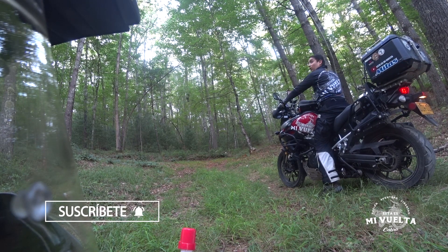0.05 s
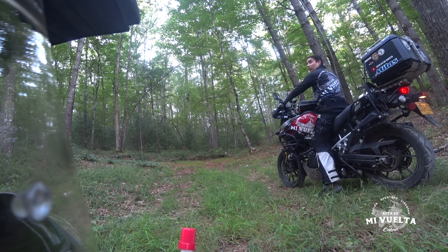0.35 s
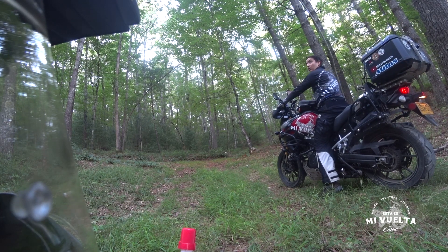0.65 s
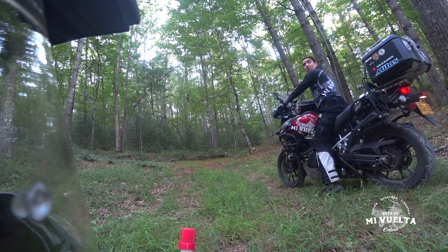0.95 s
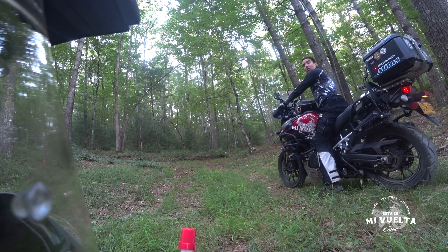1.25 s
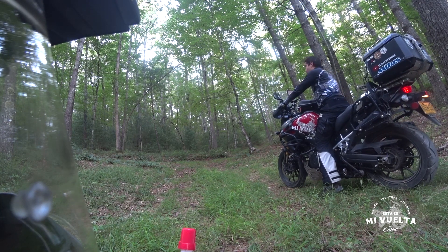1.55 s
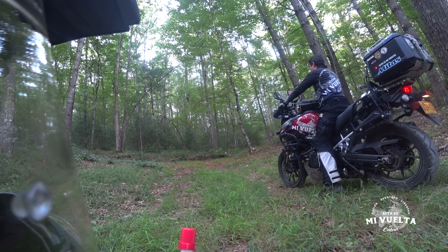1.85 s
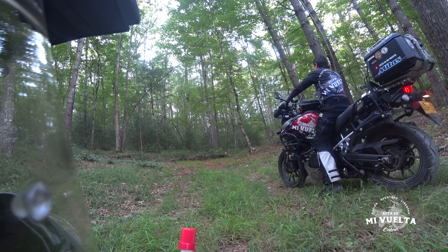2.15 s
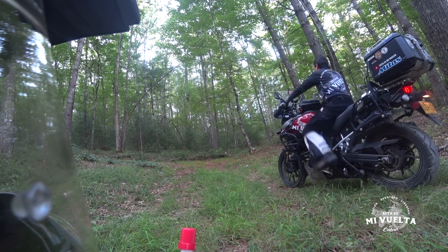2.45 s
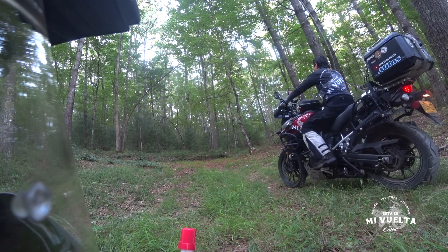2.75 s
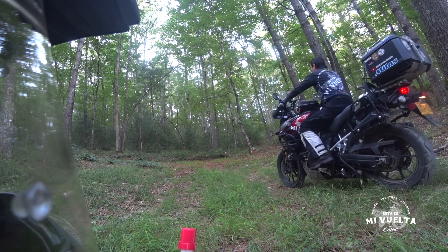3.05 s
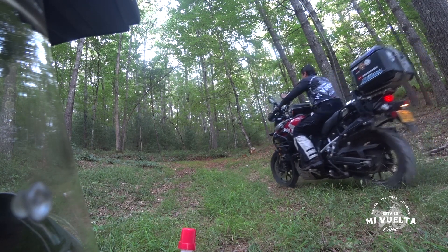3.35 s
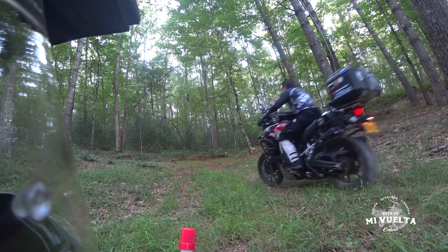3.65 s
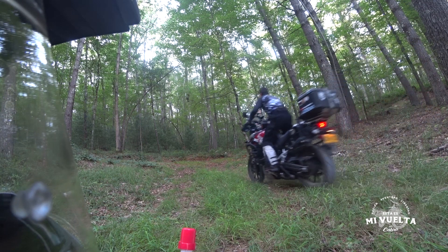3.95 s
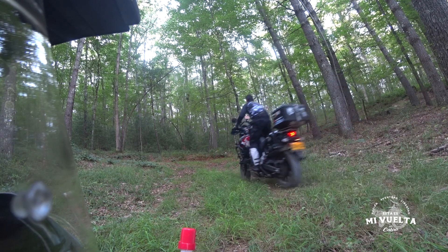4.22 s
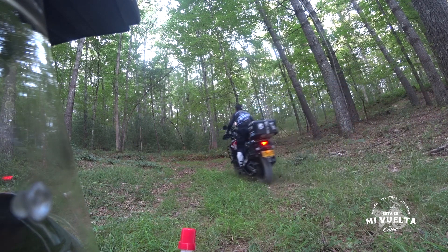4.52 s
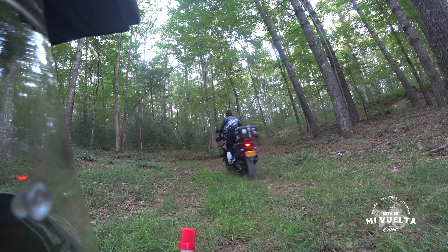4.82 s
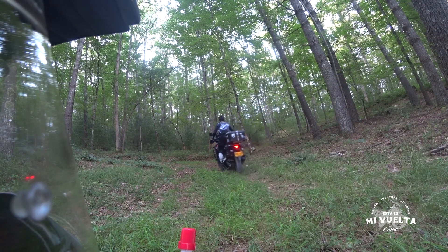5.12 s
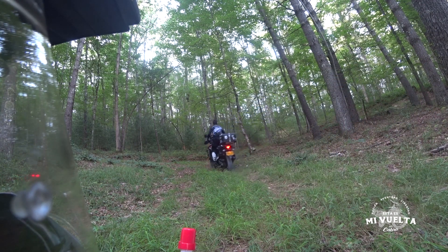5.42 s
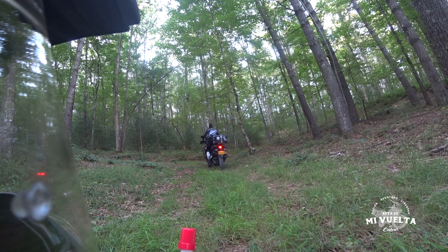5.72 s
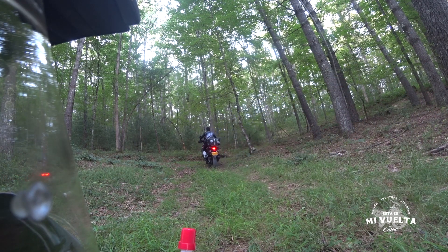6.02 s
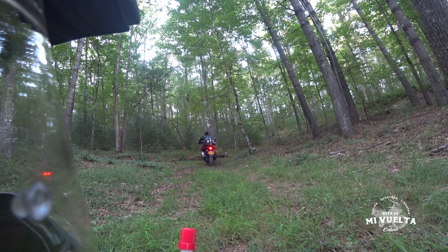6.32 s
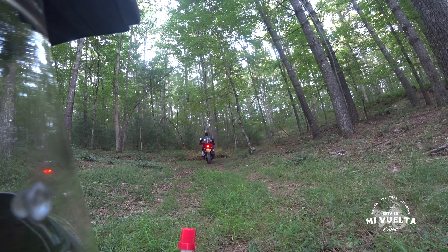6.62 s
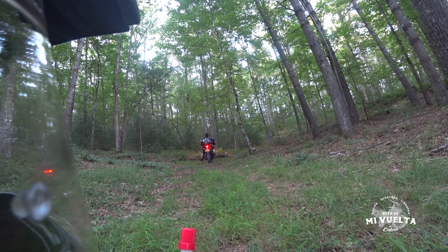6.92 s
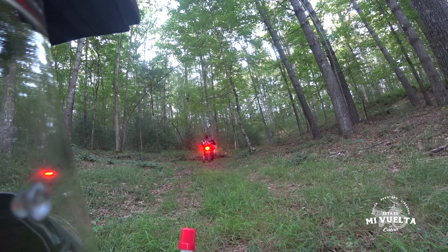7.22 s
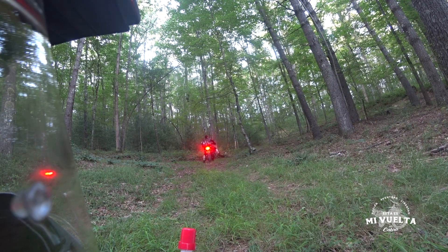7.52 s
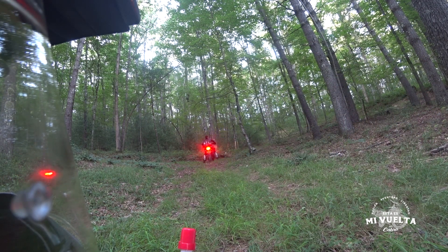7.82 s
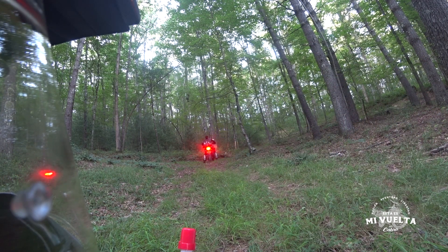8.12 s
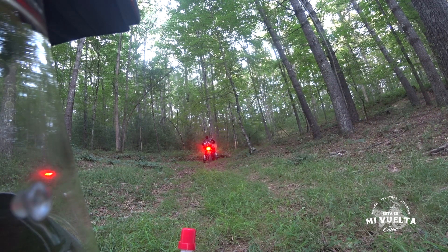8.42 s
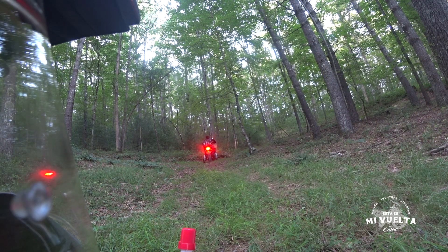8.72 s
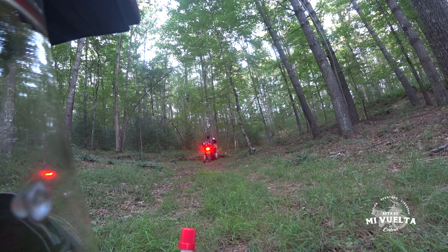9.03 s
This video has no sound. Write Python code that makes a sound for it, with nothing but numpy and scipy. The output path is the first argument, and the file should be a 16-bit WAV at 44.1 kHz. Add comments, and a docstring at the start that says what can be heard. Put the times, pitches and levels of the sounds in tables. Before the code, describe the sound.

A motorcycle about two metres from a fixed microphone primes with a thin whine, then starts with a short metallic grind. After a brief idle of uneven exhaust beats and valve clatter, the engine grows louder and rides off, revs rising and dipping, gears whining and twigs cracking. The sound recedes into still woods with a light echo and ends as a slow, distant idle.

```python
"""Motorcycle in a forest clearing

A V-twin stands about two metres from a camera with two close microphone ports. The fuel pump whines,
the starter grinds, the engine catches and idles. The bike pulls away over grass and twigs, then slows
to an idle far off among the trees. Exhaust beats, valve clatter and gear whine all follow the crank."""
import sys
import numpy as np
from scipy import signal
from scipy.fft import rfft, irfft
from scipy.io import wavfile
from scipy.ndimage import uniform_filter1d, map_coordinates

SR = 44100
rng = np.random.default_rng(int(sys.argv[2]) if len(sys.argv) > 2 else 0)


def master(y):
    """Save y as 16-bit WAV."""
    cut = np.clip(np.atleast_2d(y).T, -1, 1)
    pcm = np.round(cut * 32767)  # scale
    wavfile.write(sys.argv[1], SR, pcm.astype(np.int16))


N = 399987
T = np.arange(N) / SR

# still air in the clearing: (frequency [Hz], level [dB])
FOREST_SPECTRUM = [(50, -39), (120, -12), (200, -7.5), (1000, 5.5), (2500, -2), (8000, -11), (11000, -9)]
# background hiss before the level steps down: (frequency [Hz], level [dB])
HISS_SPECTRUM = [(50, -34), (120, -18), (250, -6.5), (1000, 2.5), (2500, -3.5), (6000, -11.5), (11000, -8)]
# between the microphone ports: (frequency [Hz], left phase lead [rad])
PORT_LEAD = [(60, 1), (150, -0.063), (340, -0.74), (1000, -1.13), (2700, -1), (3600, -0.84), (6000, -0.77),
             (11000, -0.067)]
# (frequency [Hz], likeness of the ports [0-1])
PORT_LIKENESS = [(60, 1), (2500, 0.4), (5000, 0.48), (11000, 0.34)]
# bike close by, and once it has left: (frequency [Hz], left minus right [dB])
BALANCE_NEAR = [(100, 2), (1000, 1), (2000, 1), (4000, -3), (10000, -3.5)]
BALANCE_FAR = [(100, 2.1), (2000, 1.8), (6000, 1.9)]
# twigs and stones under the tyres: (time [s], level [dB], ring [Hz])
TWIG_SNAPS = [(4.672, -38, 3760), (4.818, -31, 4020), (5.024, -35, 7500), (5.127, -32.5, 3660),
              (5.4, -29, 5060), (5.414, -28, 3460), (5.761, -36, 8000), (6.179, -38, 3460),
              (6.299, -35.5, 4320)]
# switch, lever and solenoid: (time [s], level [dB], centre [Hz], spread [octaves], t60 [s])
SWITCH_CLICKS = [(.911, -50.5, 2380, 1.66, 0.1), (.942, -49.5, 477, 0.73, 0.1),
                 (.986, -54.5, 8700, 0.49, .03), (1.172, -30.5, 4330, 1.9, 0.039)]
# grinding metal: (frequency [Hz], level [dB])
GRIND_SPECTRUM = [(100, -42), (400, -19.5), (800, -19), (1000, -7.5), (1500, 2.5), (2400, -3.5),
                  (3300, -11.5), (4300, -7), (5200, -20.5), (7500, -15), (11000, -24)]
# starter drive slipping: (time [s], level [dB], pitch [Hz], half length [s], roughness [0-1])
STARTER_SQUAWKS = [(1.215, -24, 1640, .003, 0.1), (1.235, -25, 1500, 0.0054, 0.24),
                   (1.256, -19.5, 1630, 0.0062, 0.27), (1.273, -20.5, 1650, 0.0046, 0.13),
                   (1.356, -13, 1420, 0.0041, 0.29), (1.380, -15.5, 1430, 0.0051, 0.5),
                   (1.405, -22, 1500, 0.0077, 0.67), (1.476, -14, 1690, 0.006, 0.52),
                   (1.49, -12.5, 1600, 0.0041, 0.3), (1.502, -12.5, 1390, 0.0044, 0.18)]
# crank: (time [s], four-stroke cycle rate [Hz])
CRANK_SPEED = [(1.412, 3.44), (1.55, 13.2), (1.64, 14.5), (1.72, 13.8), (1.85, 11.4), (2.03, 11.5),
               (2.218, 10.66), (2.432, 11.69), (2.803, 11.4), (2.945, 10.79), (3.131, 15.01), (3.616, 15.3),
               (3.937, 17.51), (4.021, 12.45), (4.173, 12.24), (4.448, 17.84), (4.838, 12.4),
               (5.132, 14.95), (5.369, 15.1), (5.581, 14.44), (5.702, 15.54), (5.87, 13.74), (6.019, 13.2),
               (6.274, 17.16), (6.65, 16.05), (6.78, 19.2), (6.82, 18.6), (6.91, 15.4), (7.04, 11.75),
               (7.13, 9), (7.49, 9), (7.566, 9.6), (7.86, 9.36), (8.09, 9.75), (8.18, 9.4), (8.6, 9.25),
               (8.77, 9.7), (8.9, 9.4)]
# the rider's hand: (time [s], throttle opening [0-1])
HAND_THROTTLE = [(2.96, 0), (3.04, 0.56), (3.6, 0.81), (4.0, 0.92), (4.1, 0.61), (4.35, 1), (4.58, 0.75),
                 (5.75, 0.9), (6.05, 0.66), (6.86, 0.73), (7.06, 0.53)]
# rolling off and braking: (time [s], speed [m/s])
ROAD_SPEED = [(3.35, 0), (4.05, 3), (6.7, 7), (7.35, 0.5)]
# whines as the engine eases off: (time [s], length [s], level [dB], pitch [Hz], fall [Hz/s])
FALLING_WHINES = [(1.631, .17, -36.5, 3290, 2870), (2.222, .13, -40, 3340, 4900),
                  (6.5, 0.31, -54, 4110, 2610)]
# chain and tyres: (frequency [Hz], level [dB])
CHAIN_SPECTRUM = [(2500, -14.5), (4000, 1), (5000, -1), (7500, 1), (9000, -7), (10200, -3.5), (11200, -14)]
# valve and piston knocks: (place in cycle [0-1], level [dB])
VALVE_KNOCKS = [(.01, -1.5), (.12, 2.5), (.29, -0.5), (.35, 1.5), (.47, -1.5), (.6, -1.5), (.69, -1.5),
                (.95, -0.5)]
# gear tones: (multiple of cycle rate, level free [dB], level loaded [dB], lift when smooth [dB])
GEAR_TONES = [(62, -9, -9, 0), (66, -16, -4, 0), (86, -20, -1, 0), (124, -6, -3, -5), (166, 0, -4, 8),
              (226, -3, -14, -4)]
# slack in the clutch: (place in cycle [0-1], level [dB])
CLUTCH_LASH = [(.78, -3), (.87, -1.5), (.97, -5), (.18, -4)]
# the clutch bites, the engine lugs or stumbles: (time [s], level [dB], ring [Hz])
CLUTCH_CLACKS = [(3.531, -18, 1929), (3.8, -17, 2000), (3.862, -22, 2078), (4.059, -19, 1947),
                 (4.141, -21, 1950), (4.220, -23, 1946), (4.291, -20, 1896), (4.343, -20, 1920),
                 (7.149, -39, 1870), (7.402, -42, 2050), (7.441, -40, 2070), (7.719, -41, 2110)]
# the cases under load: (place in cycle [0-1], ring [Hz], level [dB])
CASE_PINGS = [(.96, 1300, -2.5), (.34, 1310, -1.5), (.43, 1040, -4), (0.92, 1920, -4)]
# crankcase resonances: (frequency [Hz], width [Hz], lift [dB])
CASE_MODES = [(1680, 59, 3.5), (1864, 52, 2.5), (2272, 10.3, 7)]
# engine beside the microphone, pulling off, riding away, far off: (frequency [Hz], level [dB])
ENGINE_BESIDE = [(150, -55), (300, -11.5), (520, -5.5), (650, -3.5), (725, 3.5), (830, 0.5), (1100, 0),
                 (1300, 4), (1440, 6), (1580, 1), (1900, 2), (2120, 3.5), (2300, 5), (2550, -1.5),
                 (4200, -7.5), (5500, -36)]
ENGINE_PULLING = [(150, -19), (280, 8.5), (560, 8.5), (700, 8.5), (850, 13), (1010, 11.5), (1120, 11.5),
                  (1310, 15), (1500, 7), (1650, 12.5), (1900, 14), (2060, 15.5), (2350, 16.5), (2620, 11.5),
                  (2900, 9.5), (4200, 5.5), (5500, -26), (8000, -38)]
ENGINE_AWAY = [(150, -34), (250, -5.5), (378, -4.5), (523, 4.5), (587, 2), (801, 2), (900, -4.5), (1070, 7),
               (1280, 5), (1490, 1), (1830, 4.5), (2060, 8.5), (2300, 3.5), (2920, 2), (3680, 2),
               (5500, -18), (7150, -35), (12100, -120)]
ENGINE_FAR = [(150, -55), (250, -5.5), (447, -3), (543, 6), (865, -8), (1140, 5), (1430, -1.5), (1650, 1.5),
              (1810, 3.5), (2080, 6.5), (2700, 1.5), (3640, -0.5), (4650, -10.5), (5500, -28), (7150, -91),
              (12100, -120)]
# fades from each of those colours to the next: (time [s], length [s])
COLOUR_FADES = [(2.898, 0.37), (3.94, 0.63), (6.9, 0.4)]
# single hard firings: (time [s], level [dB])
HARD_FIRINGS = [(1.534, -33.5), (1.566, -33), (7.14, -46)]
# one exhaust puff: (frequency [Hz], level [dB])
PUFF_SPECTRUM = [(25, -40), (45, -38), (60, -2), (76, 2.5), (100, -4), (130, -3.5), (200, -10), (270, -23),
                 (400, -22), (700, -26), (1500, -39.5)]

FIRINGS = [0, .375]  # the two cylinders' places in the cycle
# (level parked [dB], lift at full throttle [dB], loss per doubling of distance [dB])
THUMP_LAW, RING_LAW = (-56, 16.1, 4), (-52.5, 13.4, 3.46)  # the pipe points back, so it fades least
CLATTER_LAW, CHAIN_LAW = (-29.5, 4.43, 5.95), (-45, 7.43, 5.01)
LEVEL_STEP_S = 0.582  # pump whine and background hiss both drop abruptly as the level steps down
STARTER_ON_S, STARTER_OFF_S = 1.17, 1.56
PARKED_M, BAND_LIMIT_HZ = 2.13, 11150


def gain_of(db):
    """Decibels to gain."""
    return 10 ** (np.asarray(db) / 20)


def unit_rms(x):
    """Scales to rms 1."""
    return x / np.sqrt(np.mean(x ** 2) + 1e-20)


def steadied(x, size=9000):
    """Scales to a running rms of 1."""
    power = abs(uniform_filter1d(uniform_filter1d(x ** 2, size), size))
    return x / np.sqrt(power + 1e-4 * np.mean(x ** 2))


def at_hz(points, hz):
    """Interpolates a table on a log-frequency axis."""
    f, value = np.transpose(points)
    return np.interp(np.log(hz + 1), np.log(f + 1), value)


def curves(rows):
    """Each column of a timed table at every sample."""
    s, *columns = np.transpose(rows)
    return [np.interp(T, s, c) for c in columns]


def after(s, rise):
    """Ramps from 0 to 1, starting at time s."""
    return np.clip((T - s) / rise, 0, 1)


def noise():
    """White noise."""
    return rng.standard_normal(N)


def wander(hz):
    """Random drift of rms 1, up to about this rate."""
    lowpass = np.exp(-(np.fft.rfftfreq(N, 1 / SR) / hz) ** 2)
    return unit_rms(irfft(rfft(noise()) * lowpass, N))


def sine(hz):
    """A tone that follows a pitch curve."""
    return np.sin(2 * np.pi * np.cumsum(hz) / SR)


def coloured(x, points, modes=(), size=8192):
    """Causal filter from a spectrum and resonant lifts."""
    hz = abs(np.fft.fftfreq(size, 1 / SR))
    db = at_hz(points, hz) + sum(lift / (1 + ((hz - f) / width) ** 2) for f, width, lift in modes)
    log_gain = np.log(gain_of(np.maximum(db, -100)))
    response = np.fft.ifft(np.exp(signal.hilbert(log_gain).conj())).real
    return signal.oaconvolve(x, response[:size // 2])[:len(x)]


def resonate(x, hz, width):
    """A resonance of gain 1 that can follow a pitch curve."""
    carrier = np.exp(2j * np.pi * np.cumsum(hz * np.ones(N)) / SR)
    pole = np.exp(-np.pi * width / SR)
    return 2 * (carrier * signal.lfilter([1 - pole], [1, -pole], x / carrier)).real


def taps(rows, size=8192):
    """Short dying noise bursts, each in its own band."""
    out, t, hz = np.zeros(N + size), np.arange(size) / SR, np.fft.rfftfreq(size, 1 / SR)
    for s, db, centre, spread, t60 in rows:
        band = np.exp(-(np.log2((hz + 1) / centre) / spread) ** 2) * (hz < BAND_LIMIT_HZ)
        burst = unit_rms(irfft(rfft(rng.standard_normal(size)) * band))
        out[round(s * SR):][:size] += burst * gain_of(db - 60 * t / t60)
    return out[:N]


def forest_air():
    """Still air in the clearing."""
    return gain_of(-64.5) * unit_rms(coloured(noise(), FOREST_SPECTRUM))


def background_hiss():
    hiss = gain_of(-55) * unit_rms(coloured(noise(), HISS_SPECTRUM))
    return hiss * (1 - after(LEVEL_STEP_S, 0.0084))


def trees(x, t60=0.46):
    """Trunks around the clearing scatter a thin, dull tail."""
    t = np.arange(SR // 2) / SR
    echoes = rng.standard_normal(len(t)) * (rng.random(len(t)) < .04)
    tail = echoes * gain_of(-60 * t / t60) * (t > .02)
    wet = signal.oaconvolve(x, tail / np.linalg.norm(tail))[:N]
    return coloured(wet, [(80, -10), (400, 7.0), (3000, 6.5), (10000, 1.0)])


def scattered(x, t60=0.24, near_share=0.02, far_share=0.63):
    """Ground and trunks blur the exhaust beats, more as the bike leaves the microphone."""
    t = np.arange(SR // 3) / SR
    tails = rng.standard_normal((3, len(t))) * gain_of(-60 * t / t60)
    blur = sum(signal.oaconvolve(x * np.cos(np.pi * (T + k / 3)), tail)[:N]
               for k, tail in enumerate(tails))
    share = np.interp(T, [4, 7.3], [near_share, far_share])
    return np.sqrt(1 - share) * steadied(x) + np.sqrt(share) * steadied(blur)


def twigs():
    """Twigs and stones under the tyres: a broad crack and a narrow ring."""
    cracks = taps([(s, db, 5000, 1.1, .022) for s, db, _ in TWIG_SNAPS])
    return cracks + taps([(s, db - 2.5, hz, .07, .045) for s, db, hz in TWIG_SNAPS])


def fuel_pump(racing_hz=4450, sag_hz=990, primed_s=.16, sag_s=.045):
    """The pump races unsteadily, sags as pressure builds, then recovers; its vanes rasp."""
    sag = 1 - np.exp(-np.maximum(T - primed_s, 0) / sag_s)
    recovery = np.sin(np.pi / 2 * after(0.32, 0.8))
    hz = racing_hz - sag_hz * sag * (1 - recovery)
    waver = 0.00794 * (1 + 4 * (1 - sag))
    whine = unit_rms(sine(hz * (1 + waver * wander(420))))
    rasp = unit_rms(resonate(noise(), hz - 90, width=130))
    db = -61 - 10 * after(LEVEL_STEP_S, 0.012)
    return gain_of(db) * unit_rms(whine + 0.73 * rasp) * (1 - after(STARTER_ON_S, .08))


def starter(hz=817, spin_up_s=0.037, heave_s=1.385, heave_length_s=0.053):
    """The motor whirs up and its gears grind; its pitch sinks as it heaves over a compression."""
    spin = 1 - np.exp(-(np.maximum(T - STARTER_ON_S, 0) / spin_up_s) ** 2)
    heave = np.exp(-((T - heave_s) / heave_length_s) ** 2)
    turns = np.cumsum(hz * spin * (1 - 0.15 * heave) * (1 + 0.03 * wander(230))) / SR
    whine = sum(np.sin(2 * np.pi * k * turns) for k in range(1, 5))
    # the housing holds back low notes, and the whine fades once the motor takes the load
    whine = unit_rms(coloured(whine, [(550, -17.0), (790, 1.5), (1600, -1), (2300, 5), (3200, -12)]))
    whine *= gain_of(-1 - 14 * after(1.284, 0.025))
    grind = unit_rms(coloured(noise(), GRIND_SPECTRUM))
    return gain_of(-32 + 3 * heave) * spin * (grind + whine) * (1 - after(STARTER_OFF_S, 0.025))


def squawks(sink_hz_per_s=3500, shrill_db=-13):
    """The starter drive slips against each compression in metallic squawks that sink in pitch."""
    out, rasp = np.zeros(N), unit_rms(coloured(noise(), GRIND_SPECTRUM))
    waver = 1 + 0.018 * wander(480)
    chatter = 1 + 0.12 * wander(770)
    for s, db, hz, length, rough in STARTER_SQUAWKS:
        span = abs(T - s) < .04
        t = T[span] - s
        edge = min(gain_of(db - shrill_db), 1)  # only the hard ones have strong overtones
        angle = 2 * np.pi * np.cumsum((hz - sink_hz_per_s * t) * waver[span]) / SR
        overtones = gain_of(-14) * np.sin(3 * angle) + gain_of(-16) * np.sin(5 * angle)
        tone = unit_rms(chatter[span] * (np.sin(angle) + edge * overtones))
        envelope = gain_of(db) * np.exp(-(t / length) ** 2 / 2)
        out[span] += envelope * ((1 - rough) * tone + rough * rasp[span])
    return out


def throttle(flare_s=1.74, flare_opening=0.33, fade_s=0.41):
    """Throttle opening, 0-1: the start-up flare, then the rider's hand."""
    flare = flare_opening * np.exp(-np.maximum(T - flare_s, 0) / fade_s)
    return np.clip(curves(HAND_THROTTLE)[0] + flare, 0, 1)


def road_speed():
    """Metres per second over the ground."""
    return curves(ROAD_SPEED)[0]


def settled(fast_idle_hz=11.15, slow_idle_hz=9.53):
    """How far the engine has sunk to its slow idle, 0-1."""
    return np.clip((fast_idle_hz - curves(CRANK_SPEED)[0]) / (fast_idle_hz - slow_idle_hz), 0, 1)


def gain_at_mic(parked_db, throttle_db, doubling_db):
    """One part of the bike: louder with throttle, softer at a slow idle, fainter with distance."""
    distance = PARKED_M + np.cumsum(road_speed()) / SR
    loss_db = doubling_db * np.log2(distance / PARKED_M)
    return gain_of(parked_db + throttle_db * throttle() - 3.5 * settled() - loss_db)


def strikes(cycles, place, scatter):
    """One click of uneven size each time the crank passes a place in its cycle."""
    passed = np.diff(np.floor(cycles - place), prepend=np.floor(cycles[0] - place))
    return passed * gain_of(scatter * rng.uniform(-3.0, 3.4, N))


def power_strokes(cycles, sharpness=9):
    """A bump from 0 to 1 around each firing."""
    return sum(np.exp((np.cos(2 * np.pi * (cycles - at)) - 1) * sharpness) for at in FIRINGS)


def silencer_hum(cycles, multiple=19):
    """At the distant slow idle the silencer hums thinly on one multiple of the cycle rate."""
    return gain_of(-61) * settled() * np.sin(2 * np.pi * multiple * cycles) * after(7, .1)


def falling_whines(waver=0.0029):
    """Thin tones that swell, sink in pitch and fade as the engine eases off."""
    out = np.zeros(N)
    for s, length, db, hz, fall in FALLING_WHINES:
        progress = after(s, length)
        tone = sine((hz - fall * length * progress) * (1 + waver * wander(200)))
        out += gain_of(db) * np.sin(np.pi * progress ** .7) * tone
    return out


def knocks(cycles, scatter, t60):
    """Valves and pistons knock, each a short burst of noise."""
    hits = sum(gain_of(db) * strikes(cycles, place, scatter) for place, db in VALVE_KNOCKS)
    return unit_rms(signal.lfilter([1], [1, -gain_of(-60 / (t60 * SR))], hits) * noise())


def chain_and_tyres(cycles, grit_per_s=260, grit_s=0.00068, db_per_mps=1.06):
    """Valves tick, the drive chain hisses and tyres crackle through dry litter, louder with speed."""
    grains = (rng.random(N) < grit_per_s / SR) * gain_of(-6 * np.minimum(rng.exponential(1, N), 4))
    grit = unit_rms(signal.lfilter([1], [1, -np.exp(-1 / (grit_s * SR))], grains) * noise())
    rolling = road_speed()
    drive = noise() + gain_of(-3) * knocks(cycles, scatter=3.8, t60=0.09)
    drive += gain_of(-6) * rolling / rolling.max() * grit
    drive *= gain_of(2 * throttle() * power_strokes(cycles))
    hiss = steadied(coloured(drive, CHAIN_SPECTRUM))
    return gain_at_mic(*CHAIN_LAW) * gain_of(db_per_mps * rolling) * hiss * after(1.5, 0.035)


def gears(cycles, speed, free_hz=10, loaded_hz=19.3, flutter_db=5, lash_db=1.5):
    """Teeth warble as the crank lurches, chatter as it lugs and sing as it slows or spins fast."""
    slowing = np.clip(-uniform_filter1d(np.gradient(speed) * SR, 3000) / 13, 0, 1)
    slowing *= (1 - throttle() ** 2) * np.clip(speed - 9.8, 0, 1)
    lugging = throttle() * np.clip(14 - speed, 0, 1) * (1 - slowing) * np.tanh(road_speed())
    spinning = 0.25 * after(4.2, .2) * np.clip(speed - 15, 0, 1)
    smooth = np.maximum(slowing * (1 - lugging), spinning)
    load = np.clip((speed - free_hz) / (loaded_hz - free_hz), 0, 1) ** 0.54 * (1 - 0.095 * slowing)
    ripple = np.sin(2 * np.pi * cycles) + np.sin(4 * np.pi * cycles) / 2
    lurch = (0.0037 + 0.0029 * settled()) * ripple * (1 + wander(9) / 2)
    wobble = (0.0014 + 0.0026 * lugging) * wander(59)
    jolt = 0.00056 * np.tanh(road_speed()) * wander(30)  # bumpy ground
    turns = cycles + (lurch + wobble + jolt) * (1 - 0.9 * smooth)
    mesh = np.zeros(N)
    for multiple, free, loaded, lift in GEAR_TONES:
        db = free + load * (loaded - free) + lift * smooth + flutter_db * np.tanh(wander(40))
        mesh += gain_of(db) * np.sin(2 * np.pi * multiple * turns)
    slack = gain_of(-lash_db * np.cos(2 * np.pi * cycles))
    return steadied(mesh * slack) * gain_of(-5 + throttle() + 2.5 * smooth)


def clutch_rattle(cycles, near_hz=1905, far_hz=2085, waver_hz=45, t60=.04):
    """Slack in the clutch rattles in short ringing bursts, a few uneven ones in every cycle."""
    hits = sum(gain_of(db) * strikes(cycles, place, scatter=2.4) for place, db in CLUTCH_LASH)
    bursts = uniform_filter1d(signal.lfilter([1], [1, -gain_of(-60 / (t60 * SR))], hits), size=260)
    hz = near_hz + (far_hz - near_hz) * after(4.4, .5)
    ring = bursts * sine(hz + waver_hz * wander(150))
    return steadied(ring, size=20000) * gain_of(-10 + 3 * throttle() + 1.5 * settled())


def clutch_clacks(rise_s=0.0022, t60=0.051, waver=0.035, rough=0.2):
    """Hard clacks of the clutch: a rough ring that dies quickly."""
    ages = [(np.maximum(T - s, 0), db) for s, db, _ in CLUTCH_CLACKS]
    bursts = sum(np.minimum(t / rise_s, 1) * gain_of(db - 60 * t / t60) for t, db in ages)
    ring = unit_rms(sine(curves(CLUTCH_CLACKS)[1] * (1 + waver * wander(249))))
    return bursts * ((1 - rough) * ring + rough * unit_rms(coloured(noise(), GRIND_SPECTRUM)))


def case_pings(cycles, width_cycles=0.054, waver=0.01197):
    """The cases ping in step with the crank while the bike pulls away."""
    out = np.zeros(N)
    for place, hz, db in CASE_PINGS:
        offset = (cycles - place + .5) % 1 - .5
        envelope = gain_of(db) * np.exp(-(offset / width_cycles) ** 2 / 2)
        out += envelope * sine(hz * (1 + waver * wander(20.2)))
    return out * after(*COLOUR_FADES[0]) * (1 - after(*COLOUR_FADES[1]))


def clatter(cycles, speed):
    """Knocks, cam chain and gears sound through the crankcase; the colour turns as the bike leaves."""
    pattern = rng.standard_normal(1600)  # the same surfaces meet again in every cycle
    repeating = unit_rms(map_coordinates(pattern, [cycles % 1 * len(pattern)], mode="grid-wrap"))
    drive = noise() + gain_of(-2) * knocks(cycles, scatter=1.8, t60=0.031)
    drive = unit_rms(drive + gain_of(-3) * repeating)
    pulling = throttle() * (1 - 0.82 * after(3.3, 0.92))
    bite = gain_of((1 + 2 * pulling) * power_strokes(cycles))  # hardest at each firing
    drive = steadied(drive * bite) + 0.48 * gears(cycles, speed)
    colours = ENGINE_BESIDE, ENGINE_PULLING, ENGINE_AWAY, ENGINE_FAR
    body, *later = [steadied(coloured(drive, colour, CASE_MODES)) for colour in colours]
    for (s, length), next_body in zip(COLOUR_FADES, later):
        body += after(s, length) * (next_body - body)
    # with the throttle shut the airbox knocks once a cycle
    gulp = strikes(cycles, place=.13, scatter=2.4)
    chuff = gain_of(-21) * unit_rms(resonate(gulp, hz=531, width=52)) * (1 - throttle())
    parts = steadied(body) + clutch_rattle(cycles) + case_pings(cycles) + chuff
    return gain_at_mic(*CLATTER_LAW) * parts * after(1.505, 0.057)


def hard_firings(hz=175, t60=0.2):
    """Single charges boom in the pipe."""
    ages = [(np.maximum(T - s, 0), db) for s, db in HARD_FIRINGS]
    return sum(gain_of(db - 60 * t / t60) * np.sin(2 * np.pi * hz * t) for t, db in ages)


def exhaust(cycles, speed, cold_hz=179, hot_hz=208, flow_s=0.013, bounce_s=0.0175):
    """Two unevenly spaced puffs a cycle thump and ring the silencer; hot, fast gas lifts its note."""
    first, second = [strikes(cycles, place, scatter=.5) for place in FIRINGS]
    puffs = -first - gain_of(1.5) * second
    flow = signal.lfilter([1], [1, -np.exp(-1 / (flow_s * SR))], abs(puffs))
    puffs = unit_rms(puffs) + gain_of(-25) * unit_rms(flow * noise())
    # each puff comes back once from the end of the pipe
    thump = coloured(puffs + 0.38 * np.roll(puffs, round(bounce_s * SR)), PUFF_SPECTRUM)
    ring = resonate(puffs, np.interp(speed, [11.7, 15.4], [cold_hz, hot_hz]), width=25)
    ring = coloured(ring, [(60, 2.0), (150, 8.5), (230, 1.0), (330, 9.5), (900, -22)])
    beats = gain_at_mic(*THUMP_LAW) * scattered(thump) + gain_at_mic(*RING_LAW) * scattered(ring)
    return beats * gain_of(0.5 * wander(4.9) - settled()) * after(1.521, 0.017)


def microphone_ports(x):
    """Two close ports hear the bike out of step, less alike in treble; the balance turns as it goes."""
    hz, t, spectrum = signal.stft(x, SR, nperseg=256, noverlap=192)
    gone = np.clip((t - 3.4) / 1.6, 0, 1)
    side_db = np.outer(at_hz(BALANCE_NEAR, hz), 1 - gone) + np.outer(at_hz(BALANCE_FAR, hz), gone)
    unlike = np.sqrt(1 - np.clip(at_hz(PORT_LIKENESS, hz), 0, 1))[:, None]
    stray = spectrum * np.exp(2j * np.pi * rng.random(spectrum.shape)) * unlike
    pan = np.exp(.5j * at_hz(PORT_LEAD, hz))[:, None] * gain_of(side_db / 2)
    pair = np.array([(spectrum + stray) * pan, (spectrum - stray) / pan])
    return signal.istft(pair, nperseg=256, noverlap=192)[1][:, :N]


def scene():
    """The quiet clearing from one spot; the trees answer more as the bike rides off."""
    speed, = curves(CRANK_SPEED)
    cycles = np.cumsum(speed) / SR
    engine = exhaust(cycles, speed) + silencer_hum(cycles) + hard_firings() + clatter(cycles, speed)
    bike = engine + chain_and_tyres(cycles) + twigs() + clutch_clacks()
    bike += starter() + squawks() + falling_whines() + fuel_pump() + taps(SWITCH_CLICKS)
    into_trees = bike * gain_of(np.interp(T, [3.5, 7], [-24, -17]))
    direct = microphone_ports(bike + 0.7 * (forest_air() + background_hiss()))
    diffuse = [trees(into_trees) + .5 * (forest_air() + background_hiss()) for _ in range(2)]
    return direct + np.array(diffuse)


def record(dry):
    """The camera's band limit."""
    lowpass = signal.firwin(601, BAND_LIMIT_HZ, window=("kaiser", 8), fs=SR)
    return signal.oaconvolve(dry, lowpass[None], "same")


dry = scene()
out = record(dry)
master(out)
```